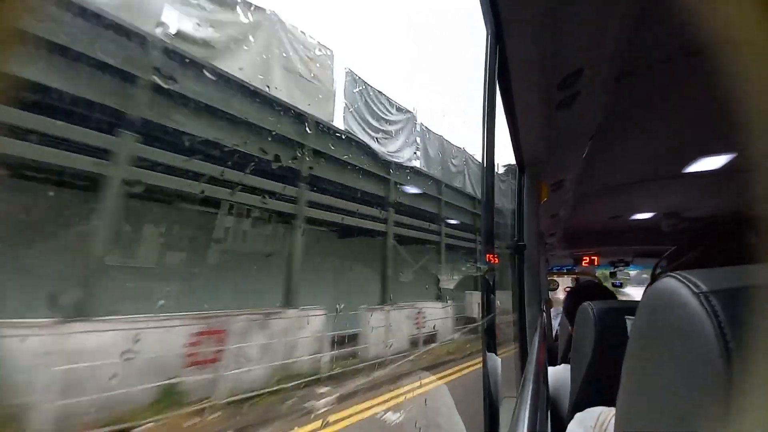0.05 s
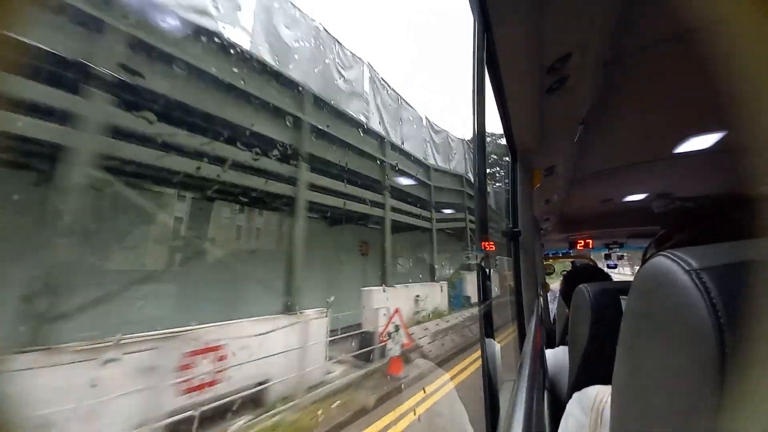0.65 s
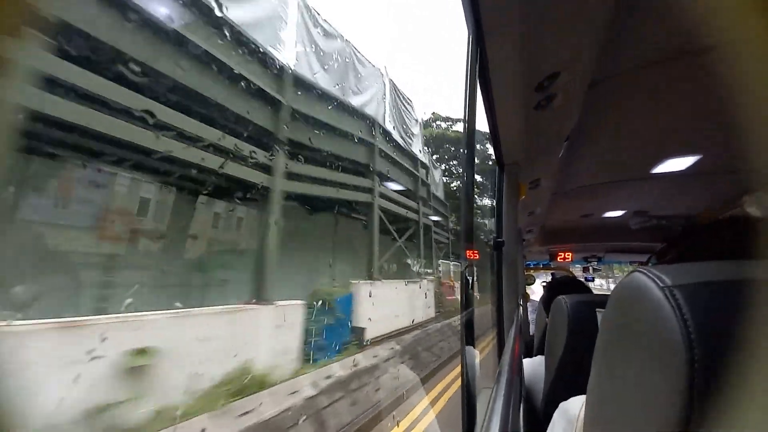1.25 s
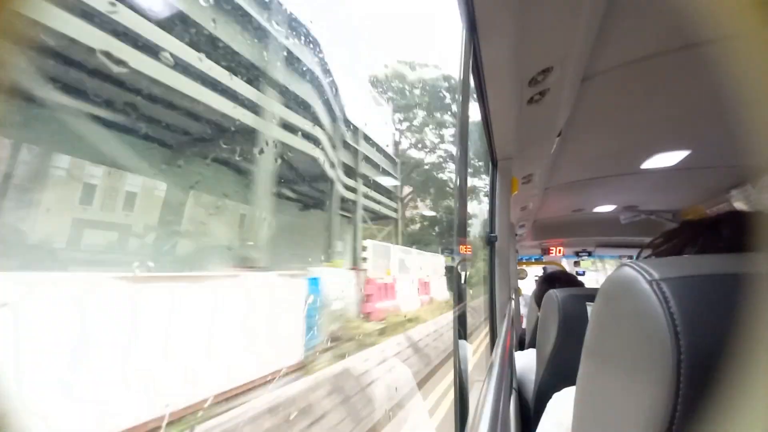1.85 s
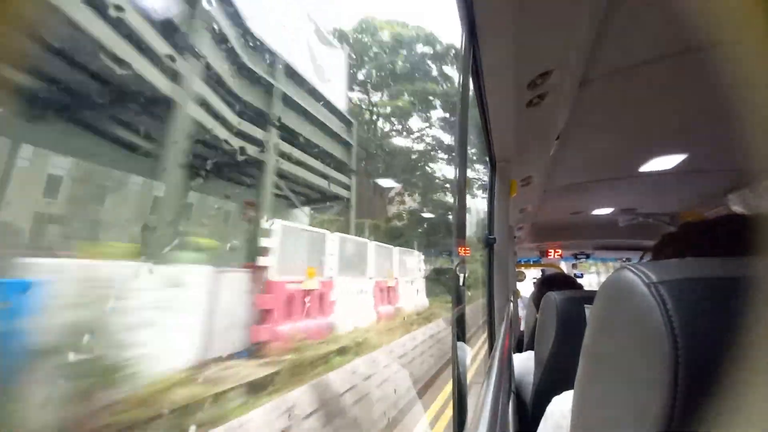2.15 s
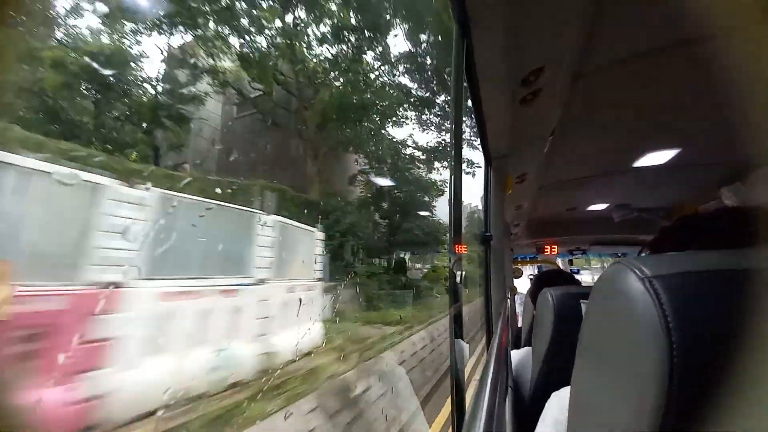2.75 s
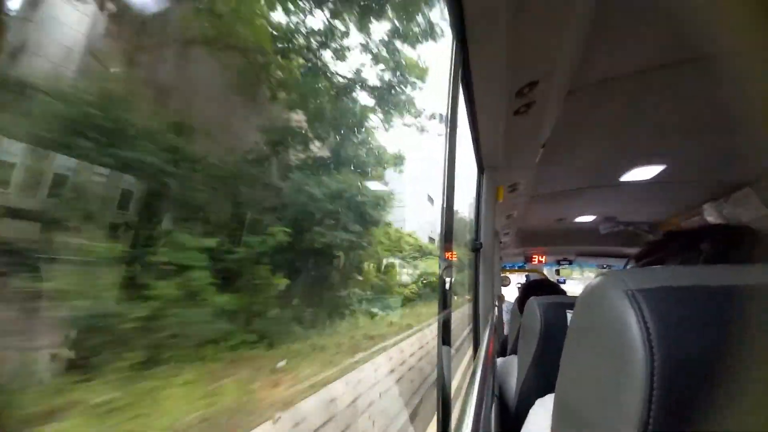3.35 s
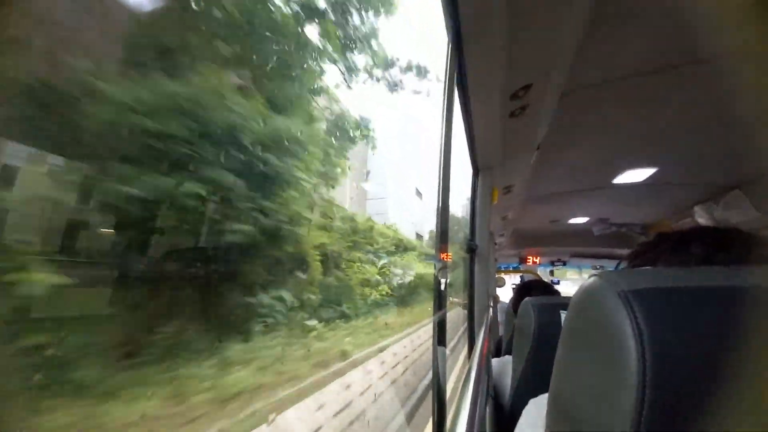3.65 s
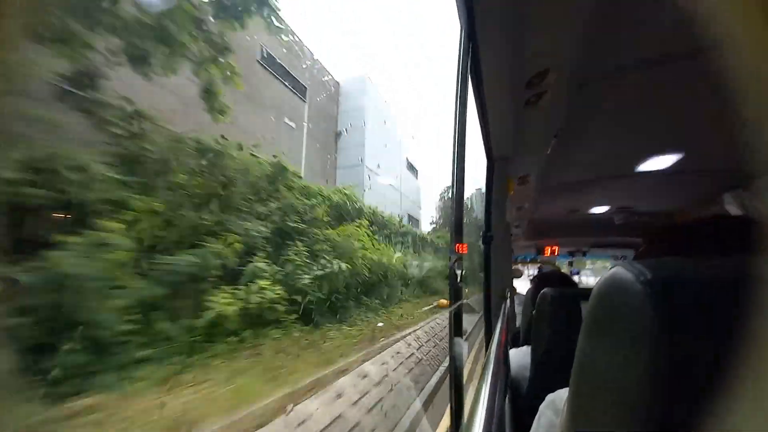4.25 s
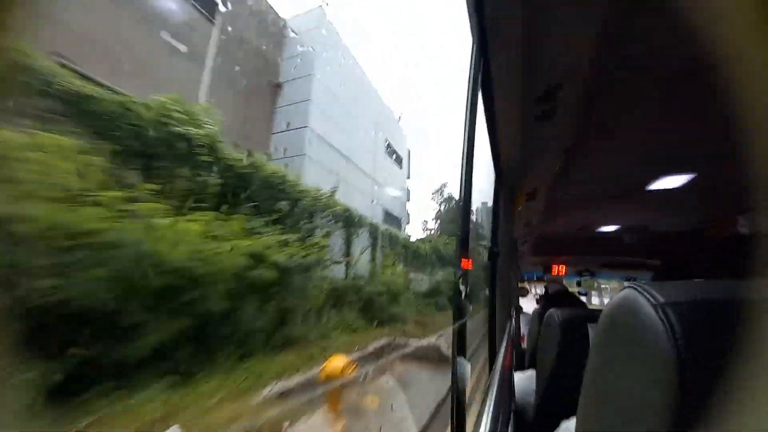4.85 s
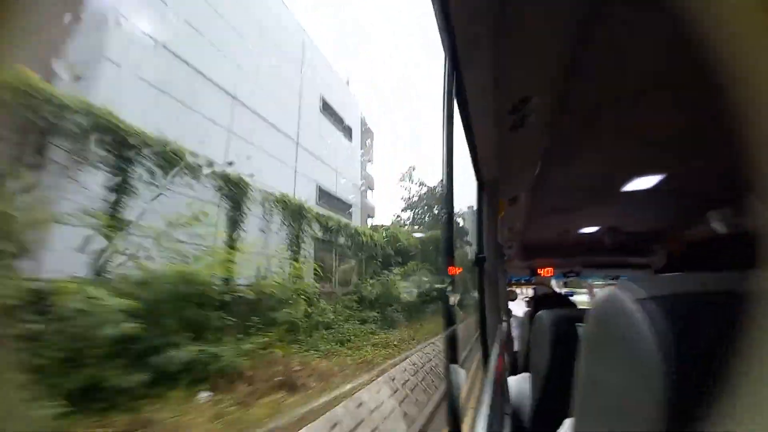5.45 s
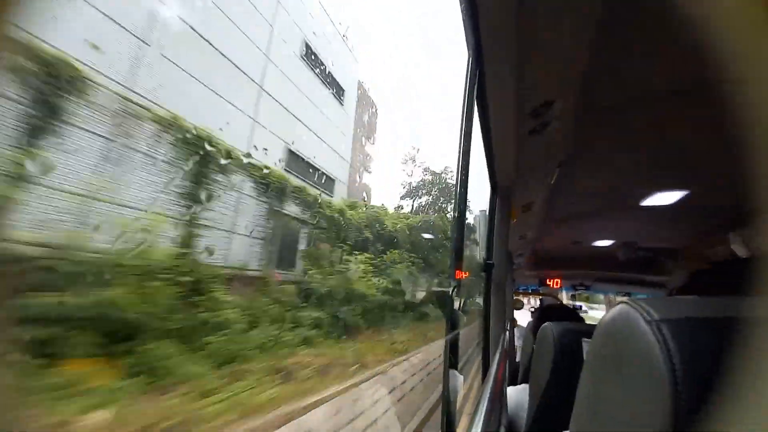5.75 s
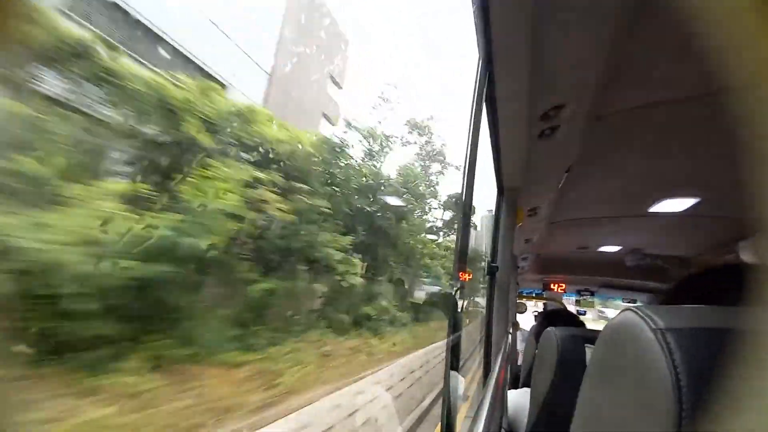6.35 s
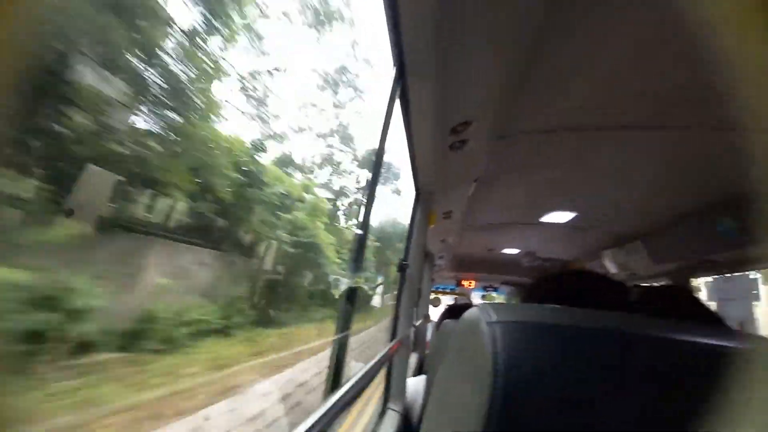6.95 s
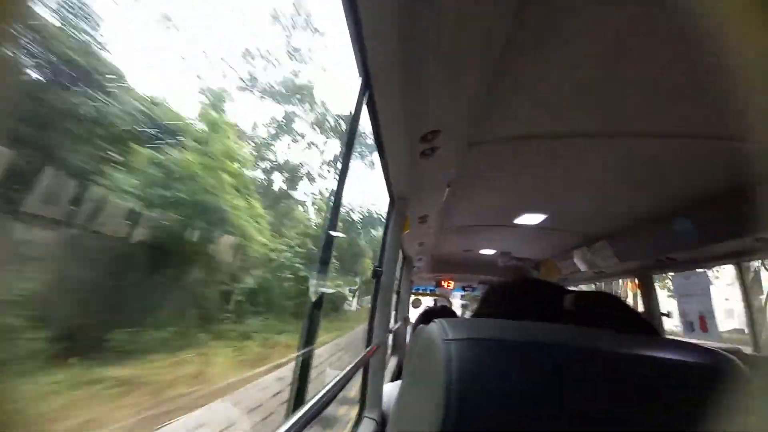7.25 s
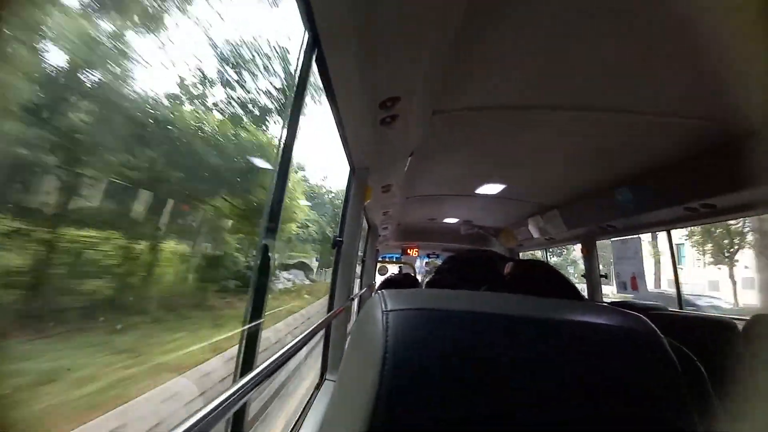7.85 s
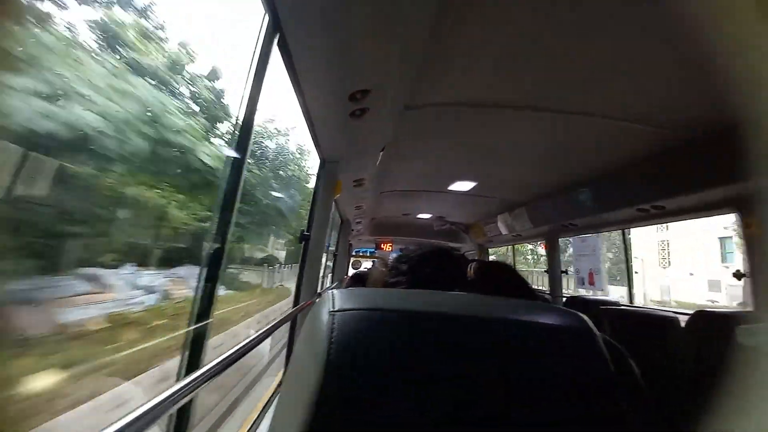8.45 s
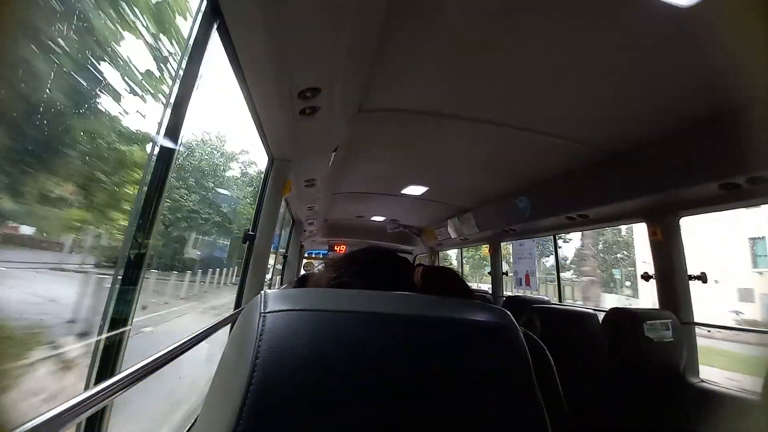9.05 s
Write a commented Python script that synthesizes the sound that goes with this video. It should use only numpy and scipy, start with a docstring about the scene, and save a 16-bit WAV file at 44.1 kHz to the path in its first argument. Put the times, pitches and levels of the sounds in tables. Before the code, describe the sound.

A deep, booming engine and a steady tyre roar fill a minibus cabin throughout. The engine climbs in pitch with a faint whine for the first four seconds. A loose fitting gives a bright metallic clack at 0.7 seconds, then fainter ones near 1.1, 2.3 and 3.1. From about 4.3 to 5 seconds the revs fall for a gear change. Between 4.5 and 6 seconds, fingers scrape, hiss and click against the camera, close to the microphone, while a run of road bumps thuds through the floor from 5 to 5.8. The engine then pulls on, lower and slowly rising. Around 6 to 7 seconds a hand partly muffles the sound and stays cupped over the microphone, leaving the bass stronger on the right. A few more finger taps come between 6.3 and 8.8 seconds, with one more bump near 7.6.

```python
"""A booming engine and roaring tyres, heard inside a minibus that speeds up, shifts gear and pulls on.
The four cylinders' firing shakes the cabin, with a faint rising whine. Bumps in the road thud through
the floor, and loose fittings clack. Halfway, a hand changes its grip on the camera: fingers rub and
tap the case and end up cupped over its two ports (the microphone openings), changing the tone."""
import sys
import numpy as np
from scipy import signal
from scipy.fft import rfft, irfft
from scipy.io import wavfile
from scipy.ndimage import uniform_filter1d

SR = 44100
rng = np.random.default_rng(int(sys.argv[2]) if len(sys.argv) > 2 else 0)


def materialize(psi):
    """Save the field psi as 16-bit PCM at rate SR to the path in sys.argv[1].

    A 1-D psi becomes a single channel; in a 2-D psi each row is a channel.
    """
    bounded = np.clip(np.atleast_2d(psi).T, -1, 1)
    quanta = np.round(bounded * 32767).astype(np.int16)
    wavfile.write(sys.argv[1], SR, quanta)


N = 404838
T = np.arange(N) / SR

# how fast the engine runs: (time [s], firing rate [Hz])
FIRING_RATE = [(0.0, 59.4), (1.0, 65.9), (2.0, 72.0), (3.0, 78.2), (3.6, 81.6), (4.15, 84.9), (4.35, 83.3),
               (4.55, 73.3), (4.7, 65.1), (5.0, 54.3), (5.5, 55.2), (6.3, 58.0), (7.4, 61.8), (8.3, 64.1),
               (9.18, 65.7)]
# how hard the engine works: (time [s], load [dB])
ENGINE_LOAD = [(0, 1), (3.2, -0.5), (4.55, -8.5), (5.7, -1), (6.5, -2), (7.4, 3.5), (9.18, -2.5)]
GAP_OPEN_HZ, GAP_NARROW_HZ = 13000, 10300  # upper ring of the air gap under the closing hand


def engine(angle, boom_flutter=0.093, flutter=0.26, smear_rad=.25, boom_per_load=.3, coast_db=-11):
    """Firing cylinders make the cabin boom; overtones follow the load, and whines set panels ringing."""
    # pitch of each overtone: (multiple of the firing rate)
    multiples = [1.5, 2, 2.5, 2.56, 2.75, 3, 3.5, 4, 4.5, 5, 5.5, 6, 7, 8.5, 12, 13]
    # base level of each overtone: (lower gear [dB], higher gear [dB])
    overtone_levels = [(-32.5, -35), (-30, -28), (-43.5, -37.5), (-42, -50), (-48.5, -59), (-45, -37),
                       (-43.5, -57), (-46.5, -41.5), (-59.5, -42.5), (-52.5, -50.5), (-59, -53), (-54, -78),
                       (-57.5, -52), (-62, -57.5), (-66.5, -83), (-67, -72)]
    # how strongly the cabin booms: (firing rate [Hz], base level [dB])
    cabin_boom = [(54, -19), (57, -27), (60, -22), (63, -20), (66, -15.5), (74, -16.5), (77.5, -17),
                  (80, -11.5), (82.5, -10.5), (85, -15.5)]
    # the boom sinks briefly: (time [s], change [dB])
    boom_dips = [(3.03, -6.5), (3.24, -4.5), (3.48, -13), (4.05, -5), (4.44, -12.5)]
    # pitches at which the panels ring: (pitch [Hz], width [Hz], level [dB])
    panel_rings = [(276.3, 50, -39.5), (336.6, 23, -39), (360, 13, -46), (517, 16, -39)]
    clutch_out_s, clutch_in_s, clutch_takes_s, dip_s = 4.74, 5.36, 0.14, 0.037
    firing_hz, load_db = follow(FIRING_RATE, T)[0], follow(ENGINE_LOAD, T)[0]
    high_gear = ramp(T, clutch_in_s, clutch_takes_s)
    coasting = ramp(T, clutch_out_s, clutch_takes_s) - high_gear
    low_gear = 1 - high_gear - coasting

    def tone(multiple, level_db=0):
        # uneven burning of the fuel shakes each tone's level and timing
        phase = multiple * angle + 2 * np.pi * rng.random() + smear_rad * waver(9)
        return np.sqrt(2) * gain_of(level_db) * (1 + flutter * waver(14)) * np.sin(phase)

    def whine(multiple):
        # swells as its pitch passes that of a panel
        ring = sum(gain_of(db) / (1 + (2 * (multiple * firing_hz - hz) / width) ** 2)
                   for hz, width, db in panel_rings)
        return ring * tone(multiple)

    dips_db = sum(db * np.exp(-((T - s) / dip_s) ** 2) for s, db in boom_dips)
    boom_db = read(cabin_boom, firing_hz)[0] + boom_per_load * load_db + coast_db * coasting + dips_db
    boom = np.sqrt(2) * gain_of(boom_db) * (1 + boom_flutter * waver(30)) * np.sin(angle)
    overtones = sum(tone(multiple, load_db + 1 + low_db + high_gear * (high_db - low_db))
                    for multiple, (low_db, high_db) in zip(multiples, overtone_levels))
    low_whine = low_gear * whine(multiple=4.29)
    high_whine = high_gear * gain_of([[-9], [0]]) * whine(multiple=8)  # quieter on the left
    return boom + overtones + low_whine + high_whine


def road_roar(angle, pulse_depth=0.064, pulse_above_hz=900, treble_per_load=.4, ripple_db=1.3):
    """Rolling tyres fill the cabin with noise, whose treble pulses with each firing of the engine."""
    # roar of tyres and body: (frequency [Hz], base level [dB per Hz])
    roar_colour = [(25, -66.5), (42, -62.5), (60, -56.5), (85, -35.5), (120, -49.5), (160, -54.5),
                   (200, -54), (240, -59), (400, -63), (530, -70.5), (640, -71), (750, -69.5), (880, -73.5),
                   (1500, -79), (1830, -81), (2200, -80.5), (3500, -88.5)]
    # how alike left and right are: (frequency [Hz], likeness [-1 to 1])
    side_likeness = [(60, 0.88), (130, 0.99), (290, 0.98), (640, 0.32), (1400, -0.18), (3000, 0.0054),
                     (15000, 0.047)]
    # how the roar changes along the road: (time [s], rumble [dB], hiss [dB])
    road_surface = [(0, 7, 0.5), (.6, 3.5, 3), (1.05, 0, 0), (2.2, 2, 0.6), (2.95, 2, 2), (4.45, 1.5, -1),
                    (4.88, 2.5, -0.5), (5.08, 9, 6.5), (5.55, 3.5, 2), (6.0, -1, -2), (6.5, -1.5, -1.5),
                    (6.9, 1.5, 0.1), (7.85, -1, 2.5), (8.3, 0, 1.5), (9.18, 4, 1)]
    rumble_hz, hiss_hz = 125, 700  # all rumble below the first, all hiss above the second
    hz, t, roar = spectra(rng.standard_normal((2, N)) * np.sqrt(SR / 2))
    alike = np.clip(read(side_likeness, hz)[0], -1, 1)[:, None]
    roar[1] = alike * roar[0] + np.sqrt(1 - alike ** 2) * roar[1]
    shares = read([(rumble_hz, 1, 0), (hiss_hz, 0, 1)], hz).T
    surface_db = shares @ follow(road_surface, t)
    # the engine adds treble as it works harder
    treble_db = above(hz, corner_hz=3500) * treble_per_load * follow(ENGINE_LOAD, t)[0]
    # the road surface changes from patch to patch
    patches = uniform_filter1d(rng.standard_normal(roar.shape[1:]), size=24, axis=0)
    patches_db = evened(uniform_filter1d(patches, size=6, axis=1))
    roar *= gain_of(read(roar_colour, hz).T + surface_db + treble_db + patches_db)
    roar *= above(hz, corner_hz=18)
    # echoes off window and seats leave a fine, steady ripple across the treble
    treble = above(hz, pulse_above_hz)
    ripple = evened(uniform_filter1d(rng.standard_normal((2, len(hz), 1)), size=3, axis=1))
    roar *= gain_of(ripple_db * treble * ripple)
    return waveform(roar) + pulse_depth * np.cos(angle) * waveform(roar * treble)


def bumps(drum_hz=(130, 290), drum_decay_s=0.032, thud_hz=78, thud_rise_s=0.012, thud_left_db=-3):
    """Each jolt makes the floor thud and sets the side panels drumming."""
    # the wheels cross broken road: (time [s], base drumming level [dB], thud [dB])
    jolts = [(4.947, -21, -17), (5.012, -24.5, -10), (5.07, -21.5, -16), (5.15, -24, -8), (5.215, -33, -9),
             (5.29, -22.5, -15), (5.41, -32, -7), (5.465, -30, -9), (5.60, -26, -14), (5.69, -31, -13),
             (5.83, -31.5, -14), (7.64, -28, -15)]
    out, t = np.zeros((2, N)), np.arange(16384) / SR
    for s, drum_db, thud_db in jolts:
        drum = band(rng.standard_normal(len(t)) * np.exp(-t / drum_decay_s), *drum_hz)
        drum = 2 * gain_of(drum_db) * drum / abs(drum).max()
        hz = thud_hz * rng.uniform(.9, 1.1)
        thud = t / thud_rise_s * np.exp(1 - t / thud_rise_s) * np.sin(2 * np.pi * hz * t)
        add(out, s, drum + gain_of([[thud_db + thud_left_db], [thud_db]]) * thud)
    return out


def ports_under_hand(cabin):
    """Each port colours the cabin sound; a cupped hand changes that colour, pressing fingers dull it."""
    # tone of the open ports: (frequency [Hz], left [dB], right [dB])
    open_colour = [(300, -0.5, -1.5), (1000, 0.5, -4), (2500, -2.5, 2), (3500, -2.5, 2.5), (4840, -5, 3.5),
                   (6590, -0.65, 4), (7640, -17, -20.5), (8900, -17, -18), (11100, -14, -5),
                   (12200, -12, 5), (14000, -13, 5.5), (15500, -21, -8)]
    # change under the cupped hand: (frequency [Hz], left [dB], right [dB])
    cupped_colour = [(68, -16, 2.5), (199, -19.5, -3.5), (338, -6.5, -1.5), (500, -2, 3), (1400, 0.5, 6),
                     (3000, 2.5, -2.5), (4220, 6.5, -9), (6550, 3.5, -33), (7800, 5.5, -15.5),
                     (10000, 4, -7.5), (13000, 2, -39.5), (15500, 5, -32)]
    # change under a fully pressed finger: (frequency [Hz], left [dB], right [dB])
    pressed_colour = [(125, -2, 0), (400, -3.5, -4), (840, -11, -10.5), (2500, -16, -17),
                      (6500, -28.5, -25), (7600, 4, -13), (10000, 3, -15), (13000, -3, -12)]
    # cupping, a left and a right row: (midpoint [s], time taken [s], cover before [0-1], after [0-1])
    cupping = [(6.35, 0.044, 0.03, 0.96), (5.06, 1.6, 0.18, 0.94)]
    # finger presses: (from [s], to [s], time to close [s], time to open [s], left [0-1], right [0-1])
    presses = [(5.875, 6.345, .02, .02, .36, 0), (6.03, 6.76, .3, 0.063, 0.15, 0.5),
               (5.17, 7.24, 0.21, 0.12, 0, 0.48), (8.13, 9.3, 0.7, .1, 0, 0.13)]
    hz, t, sound = spectra(cabin, size=1024)
    cover = np.array([before + (after - before) * ramp(t, s, length)
                      for s, length, before, after in cupping])
    pressure = sum(np.outer(sides, ramp(t, on, closing) - ramp(t, off, opening))
                   for on, off, closing, opening, *sides in presses)
    hand_db = np.clip(cover, 0, 1)[:, None] * read(cupped_colour, hz)[..., None]
    hand_db += pressure[:, None] * read(pressed_colour, hz)[..., None]
    hand_db[1] += hand_gap(hz, t)  # right port only
    return waveform(sound * gain_of(read(open_colour, hz)[..., None] + hand_db), size=1024)


def hand_gap(hz, t, low_db=6.5, top_db=7, sharpness=9, shadow_db=-16, shadow_hz=3000):
    """Gain in dB of the gap under the hand: like a pipe shut at one end, it rings at two pitches."""
    top_hz = GAP_OPEN_HZ + (GAP_NARROW_HZ - GAP_OPEN_HZ) * ramp(t, middle_s=4.5, length_s=.3)
    ratio = hz[:, None] / top_hz
    low_ring = 1 / (1 + (sharpness * (3 * ratio - 1)) ** 2)
    top_ring = 1 / (1 + (sharpness * (ratio - 1)) ** 2)
    shadow = np.clip((hz[:, None] - top_hz) / shadow_hz - .5, 0, 1)  # dull above the top ring
    ringing = ramp(t, middle_s=4.47, length_s=.55) - ramp(t, middle_s=5.6, length_s=.55)
    return ringing * (low_db * low_ring + top_db * top_ring + shadow_db * shadow)


def finger_rubs(spread=1.9, flutter_db=2.0, squeak_db=-18, squeak_hz=13250, whistle_db=-25):
    """Sliding skin scrapes the case, sizzles and squeaks on the left and whistles in the right gap."""
    # finger strokes: (start [s], length [s], pitch [Hz], left scrape [dB], right scrape [dB], sizzle [dB])
    strokes = [(4.573, 0.09, 1050, -48, -30, -46), (4.658, 0.034, 1200, -53, -23.5, -54),
               (4.7, 0.16, 1330, -66, -40, -53), (4.93, 0.13, 1890, -46, -41, -44.5),
               (5.044, .12, 2250, -41, -41, -40.5), (5.153, 0.444, 1700, -52, -59, -40.5),
               (5.58, 0.245, 900, -54, -48, -46.5), (5.84, .025, 1700, -56, -56, -41.5)]
    # sizzle of sliding skin: (frequency [Hz], relative level [dB])
    skin_colour = [(600, -7), (2000, 1.5), (4500, -6), (6600, 2.5), (7500, -14), (11000, -11), (15500, -18)]
    rise_s, release_s, fade_db = .02, 0.019, -5
    out, force, jerks = np.zeros((2, N)), np.zeros((3, N)), slips(per_s=1500)
    for start, length, centre_hz, *levels_db in strokes:
        age = np.arange(0, length + release_s, 1 / SR)
        shape = np.minimum(age / rise_s, 1) * np.clip(1 - (age - length) / release_s, 0, 1)
        push = np.outer(gain_of(levels_db), shape * gain_of(fade_db * age / length))
        stroke_jerks = jerks[:, round(start * SR):][:, :len(age)]
        scrape = band(stroke_jerks, centre_hz / spread, centre_hz * spread, order=3)
        add(out, start, push[:2] * evened(scrape))
        add(force, start, push)
    _, right_force, sizzle_force = force
    fine_jerks = slips(per_s=9000)[0]
    hz, _, fine_spectra = spectra(fine_jerks, size=512)
    sizzle = evened(waveform(fine_spectra * gain_of(read(skin_colour, hz).T), size=512))
    squeak = gain_of(squeak_db) * evened(band(fine_jerks, squeak_hz - 70, squeak_hz + 70, order=1))
    whistle = evened(band(fine_jerks, GAP_NARROW_HZ - 700, GAP_NARROW_HZ + 1100))
    out[0] += sizzle_force * gain_of(flutter_db * waver(22)) * (sizzle + squeak)
    out[1] += right_force * gain_of(whistle_db) * whistle
    return out


def slips(per_s):
    """Skin slips in tiny scattered jerks of uneven size, a separate run for each port."""
    jerks = (rng.random((2, N)) < per_s / SR) * rng.standard_normal((2, N))
    return jerks * gain_of(3 * np.minimum(rng.exponential(1, (2, N)), 3))


def finger_taps(spread=2.5, grit=0.22, top_ratio=1.27):
    """A push and a short burst of slips make the case ring very briefly."""
    # taps and creaks: (time [s], peak [dB], pitch [Hz], fade time of slips [s], left minus right [dB])
    touches = [(4.591, -27.5, 3180, .002, 3), (4.615, -14, 1400, 0.0056, -23),
               (4.682, -1, 1230, 0.000068, -37), (4.695, -37, 2600, 0.0017, -15),
               (4.721, -4.5, 1070, 0.00016, -23), (4.79, -24, 1800, 0.0016, -12),
               (4.812, -21, 1720, 0.0017, -20), (4.828, -22, 1000, 0.0016, -12),
               (5.018, -20, 2090, 0.0023, 14), (5.0739, -7.5, 2370, 0.0038, 12),
               (5.076, -12.5, 430, 0.0063, 4), (5.1385, -20.5, 2240, 0.0056, 4),
               (5.43, -24, 2500, 0.0025, 17), (5.609, -19.5, 560, 0.0092, -16),
               (5.746, -19, 880, 0.0012, -25), (6.332, -30.5, 900, 0.00055, -19),
               (6.736, -27, 700, 0.00059, -17), (7.2523, -4.5, 1490, 0.000081, -32),
               (7.593, -11, 330, 0.0031, -18), (7.652, -16.5, 520, .003, -20),
               (8.811, -10, 238, 0.0019, -21)]
    out, t = np.zeros((2, N)), np.arange(2048) / SR
    for s, peak_db, hz, decay_s, pan_db in touches:
        force = (t == 0) + grit * rng.standard_normal(len(t)) * np.exp(-t / decay_s)
        ring = band(force, hz / spread, hz * spread, order=1)
        tap = band(ring, 41, hz * top_ratio, order=3)  # the soft fingertip rounds off the treble
        sides = gain_of(np.minimum([[pan_db], [-pan_db]], 0))
        add(out, s, gain_of(peak_db) * sides * tap / abs(tap).max())
    return out


def fitting_clacks(rise_s=0.0025, snap_s=0.0037, echo_s=.03, echo_db=-12, left_db=-5):
    """A loose fitting gives a quick bright chatter, a short cabin echo and a lingering metallic ring."""
    # each clack: (time [s], level [dB], dull above [Hz])
    clacks = [(.672, -19, 17700), (1.116, -40.5, 3300), (2.289, -44, 4970), (3.10, -44.5, 4970)]
    # tone of a fitting: (frequency [Hz], relative level [dB])
    fitting_colour = [(1500, -39.5), (2300, -8.5), (2650, -2.5), (3200, -15.5), (4500, -9.5), (6200, 4),
                      (7600, -18.5), (10000, -12.5), (12500, -0.5), (15000, 3)]
    ring_hz, ring_db, ring_s = 5900, -14, 0.036
    out, t = np.zeros((2, N)), np.arange(16384) / SR
    hz = np.fft.rfftfreq(len(t), 1 / SR)
    age, onset = np.maximum(t - rise_s, 0), np.minimum(t / rise_s, 1)
    shape = onset * (np.exp(-age / snap_s) + gain_of(echo_db) * np.exp(-age / echo_s))
    for s, level_db, dull_hz in clacks:
        colour = gain_of(read(fitting_colour, hz)) / (1 + (hz / dull_hz) ** 4)
        chatter = evened(irfft(rfft(rng.standard_normal((2, len(t)))) * colour))
        ring = evened(band(rng.standard_normal((2, len(t))), ring_hz * .88, ring_hz * 1.12))
        clack = shape * chatter + gain_of(ring_db) * onset * np.exp(-age / ring_s) * ring
        add(out, s, gain_of([[level_db + left_db], [level_db]]) * clack)
    return out


def gain_of(db):
    """Turns decibels into a multiplier."""
    return 10 ** (np.asarray(db) / 20)


def evened(x):
    """Scales to an average (rms) level of 1."""
    return x / np.sqrt(np.mean(x ** 2) + 1e-20)


def follow(rows, t):
    """Every column of a time table, read at the times t."""
    s, *columns = np.transpose(rows)
    return np.array([np.interp(t, s, column) for column in columns])


def read(rows, hz):
    """Every column of a frequency table, read at hz on a log scale."""
    row_hz, *columns = np.transpose(rows)
    return np.array([np.interp(np.log(hz + 1), np.log(row_hz + 1), column) for column in columns])


def ramp(t, middle_s, length_s):
    """A straight rise from 0 to 1."""
    return np.clip((t - middle_s) / length_s + .5, 0, 1)


def waver(rate_hz):
    """Random values joined by straight lines, rate_hz of them a second."""
    knots = rng.standard_normal(1024)
    return np.interp(T * rate_hz, np.arange(len(knots)), knots)


def above(hz, corner_hz):
    """A column of weights: near 0 well below the corner, near 1 well above."""
    return (hz ** 2 / (hz ** 2 + corner_hz ** 2))[:, None]


def band(x, lo_hz, hi_hz, order=2):
    """Keeps the sound between two frequencies."""
    sections = signal.butter(order, [lo_hz, min(hi_hz, SR / 2 - 1)], "band", fs=SR, output="sos")
    return signal.sosfilt(sections, x)


def spectra(x, size=2048):
    """Splits sound into short slices: (Hz, s, channels x frequencies x slices)."""
    return signal.stft(x, SR, nperseg=size, noverlap=size - size // 4)


def waveform(slices, size=2048):
    """Joins the slices back into sound."""
    return signal.istft(slices, SR, nperseg=size, noverlap=size - size // 4)[1][..., :N]


def add(mix, s, sound):
    """Adds a sound of several channels at time s."""
    part = mix[:, round(s * SR):][:, :sound.shape[1]]
    part += sound[:, :part.shape[1]]


def scene():
    """Cabin sound through the ports, plus the rubs, taps and clacks heard directly."""
    angle = 2 * np.pi * np.cumsum(follow(FIRING_RATE, T)[0]) / SR  # one turn per firing
    cabin = engine(angle) + road_roar(angle) + bumps()
    return ports_under_hand(cabin) + finger_rubs() + finger_taps() + fitting_clacks()


def record(dry):
    """Cuts off the very highest treble."""
    low_pass = signal.firwin(511, cutoff=15750, window=("kaiser", 9), fs=SR)
    return signal.oaconvolve(dry, low_pass[None], "same")


dry = scene()
out = record(dry)
materialize(out)
```